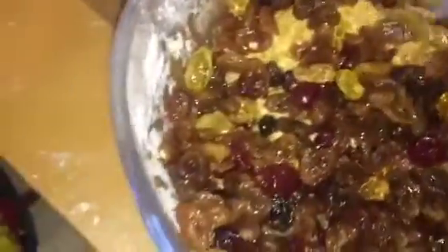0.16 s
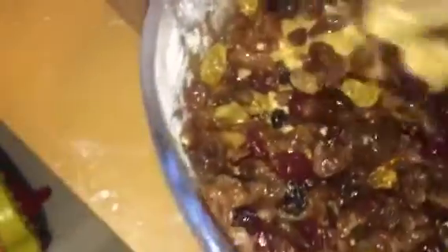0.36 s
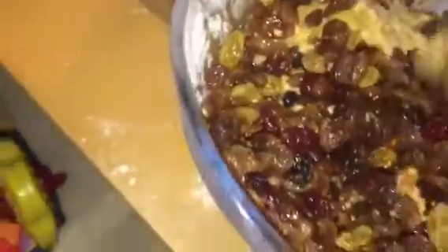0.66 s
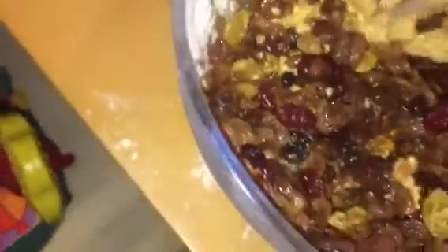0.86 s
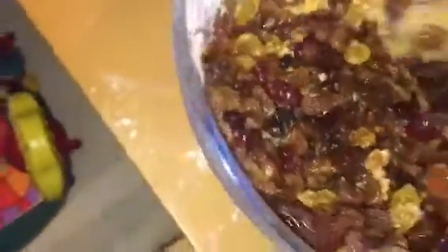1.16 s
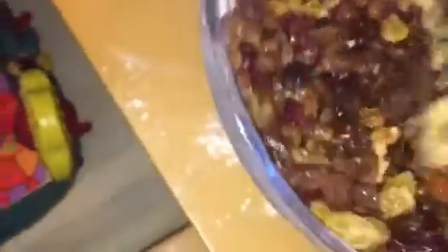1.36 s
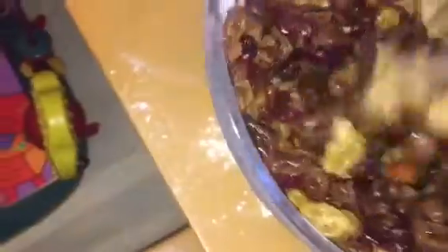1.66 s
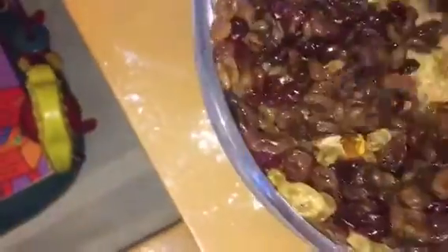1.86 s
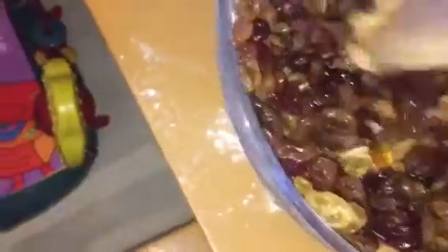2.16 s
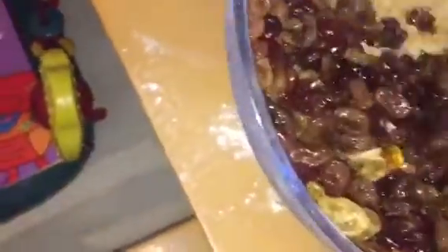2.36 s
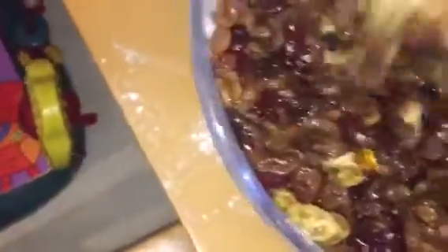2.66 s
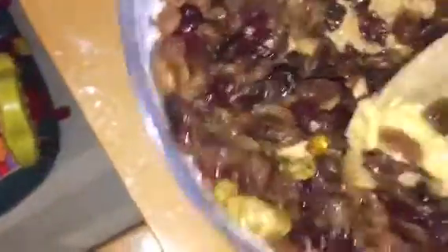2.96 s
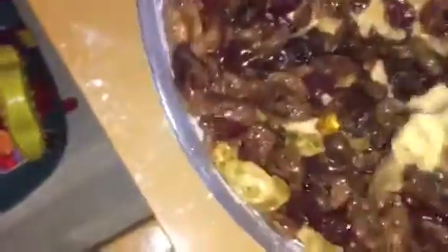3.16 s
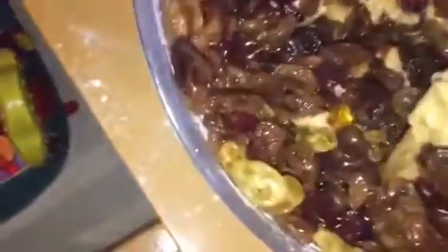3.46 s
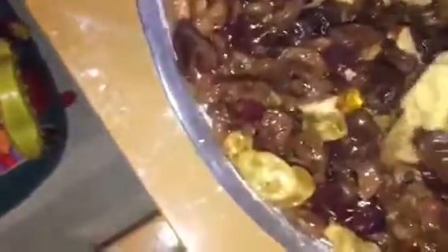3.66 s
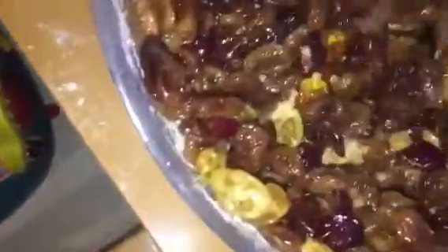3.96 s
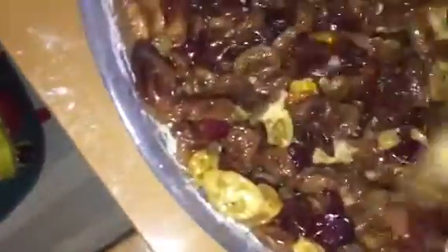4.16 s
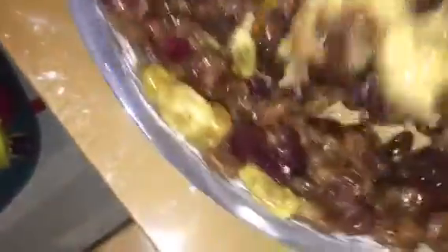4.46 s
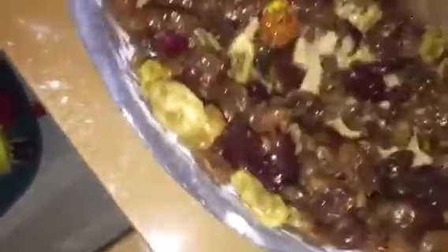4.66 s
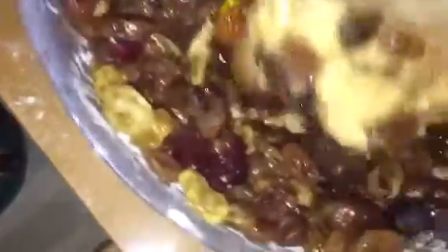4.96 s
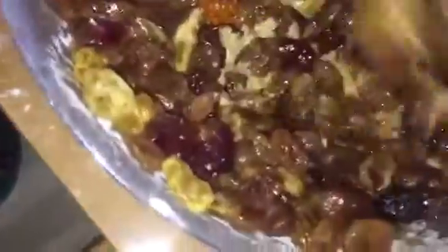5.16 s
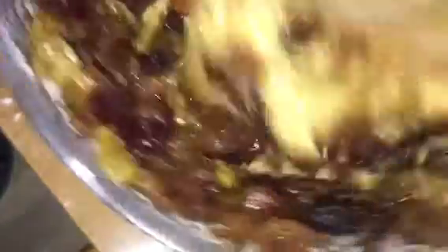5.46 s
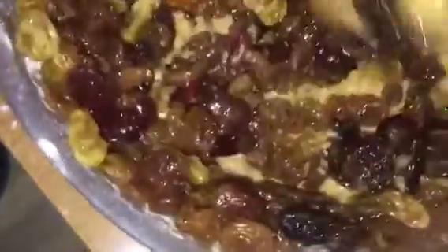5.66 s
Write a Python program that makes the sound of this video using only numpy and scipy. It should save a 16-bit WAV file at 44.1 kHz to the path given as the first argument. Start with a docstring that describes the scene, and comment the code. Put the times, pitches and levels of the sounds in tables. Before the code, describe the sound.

Very close to the microphone, a spoon pushes through heavy, wet fruit dough in short irregular strokes. Each gives a sticky squelch, fine crackle and little popping bubbles. A sharp tap comes early, then bowl thuds on the table around one and three seconds. Near the end the spoon clacks hard against the glass, with more knocks. Small kitchen, short reverberation, faint low hum.

```python
"""Spoon in wet dough

A spoon works heavy, wet fruit dough in a glass bowl on a kitchen table, close to the microphone.
Squelch, crackle and bursting bubbles are sums of tiny decaying sine grains, gated by the strokes.
Bowl knocks and spoon strikes are damped modes plus noise; one sharp tap is a fast falling sweep.
A noise tail gives the small room's answer; filtered noise gives a low hum."""
import sys
import numpy as np
from scipy import signal
from scipy.fft import rfft, irfft, next_fast_len
from scipy.io import wavfile
from scipy.ndimage import uniform_filter1d, map_coordinates

SR = 44100
rng = np.random.default_rng(int(sys.argv[2]) if len(sys.argv) > 2 else 0)


def generate_wav(signal):
    """Clip the signal to [-1, 1] and save it as 16-bit WAV at the path in sys.argv[1]."""
    frames = np.transpose(np.atleast_2d(signal))
    scaled = np.clip(frames, -1, 1) * 32767
    pcm = np.round(scaled).astype(np.int16)
    wavfile.write(sys.argv[1], SR, pcm)


N = 256662  # samples


def amp(db):
    """Decibels to amplitude."""
    return 10 ** (np.asarray(db) / 20)


def unit(x):
    """x scaled to rms 1."""
    return x / np.sqrt(np.mean(x ** 2) + 1e-20)


def crest(x):
    """x scaled to a peak of 1."""
    return x / (np.abs(x).max() + 1e-20)


def along(points, hz):
    """Interpolate (Hz, value) points on a log frequency axis."""
    f, v = np.transpose(points)
    return np.interp(np.log(hz + 1), np.log(f), v)


def fade(t, t60):
    """Decay by 60 dB in t60, in the unit of t."""
    return np.exp(-np.log(1000) * t / t60)


def add(track, s, sound):
    """Mix a sound into the track at s seconds."""
    start = max(round(s * SR), 0)
    track[start:start + len(sound)] += sound[:max(N - start, 0)]


def colour(x, gain):
    """Causal minimum-phase filter with the given gain(Hz), from the folded cepstrum."""
    size = 2 * next_fast_len(len(x) // 2 + 4096)
    log_gain = np.log(np.maximum(gain(np.fft.rfftfreq(size, 1 / SR)), 1e-6))
    cepstrum = irfft(log_gain)
    cepstrum[1:size // 2] *= 2
    cepstrum[size // 2 + 1:] = 0
    response = np.exp(rfft(cepstrum))
    return irfft(rfft(x, size) * response)[:len(x)]


def shaped(x, spectrum):
    """Filter x through a (Hz, dB) spectrum."""
    return colour(x, lambda hz: amp(along(spectrum, hz)))


def wobble(rate):
    """A smooth random curve, rate knots a second."""
    knots = rng.standard_normal(int(N * rate / SR) + 4)
    return map_coordinates(knots, [np.arange(N) * rate / SR])


def patchy(x, depth_db):
    """The colour of x shifts from moment to moment; rms 1."""
    z = signal.stft(x, nperseg=256)[2]
    field = uniform_filter1d(rng.standard_normal(z.shape), size=5, axis=0)
    field = uniform_filter1d(field, size=9, axis=1)
    return unit(signal.istft(z * amp(depth_db * unit(field)), nperseg=256)[1][:N])


def ring(modes, t, detune):
    """Damped modes, with slightly new strengths and pitches for each blow."""
    hz, db, t60 = np.transpose(modes)[:, :, None]
    strength_db, shift = rng.standard_normal((2, len(modes), 1))
    sign = (-1) ** np.arange(len(modes))[:, None]
    tones = np.sin(2 * np.pi * hz * (1 + detune * shift) * t)
    return np.sum(sign * amp(db + strength_db) * fade(t, t60) * tones, axis=0)


def grains(per_s, spread_db, cycles, spectrum):
    """Tiny ruptures of random moment, size and pitch, swelling and dying within a few cycles; rms 1."""
    when, pitch, size, turn = rng.random((int(per_s * N / SR), 4)).T[:, :, None]
    low_hz, high_hz = spectrum[0][0], spectrum[-1][0]
    hz = low_hz + pitch * (high_hz - low_hz)
    k = np.arange(min(int(cycles * SR / low_hz), 300))
    age = hz * k / SR  # in cycles
    gain = amp(along(spectrum, hz) + spread_db * np.minimum(-np.log(1 - size), 3))
    swell = age ** 2 * fade(age, 0.8 * cycles)
    waves = gain * swell * np.sin(2 * np.pi * (age + turn))
    return unit(np.bincount(((when * N).astype(int) + k).ravel(), waves.ravel(), N)[:N])


def hum():
    """Low background of the kitchen: filtered noise, slightly uneven in level and colour."""
    # background spectrum: f/Hz, relative level/dB
    hum_spectrum = [(15, -24), (25, -2.5), (80, -1.5), (212, -3.5), (317, -4.5), (439, -13.5), (591, -15),
                    (659, -17), (936, -17), (2910, -27), (9570, -38), (13200, -41.5), (16000, -35.5)]
    noise = shaped(rng.standard_normal(N), hum_spectrum)
    return amp(-57 + 0.72 * wobble(5)) * patchy(noise, depth_db=2.0)


def kitchen(x):
    """The room's answer: x convolved with a noise tail; each frequency dies at its own speed."""
    # room decay: f/Hz, t60/s
    room_decay = [(70, 0.69), (250, 0.29), (1000, 0.41), (3000, 0.27), (12000, 0.23)]
    onset_s = 0.0017
    hz, t, z = signal.stft(rng.standard_normal(SR), SR, nperseg=256)
    decayed = z * fade(t, along(room_decay, hz)[:, None])
    tail = signal.istft(decayed, SR, nperseg=256)[1]
    tail *= np.clip(np.arange(len(tail)) / SR / onset_s, 0, 1)
    return signal.fftconvolve(x, tail / np.linalg.norm(tail))[:N]


def taps():
    """A brief scuff, then a bending wave that disperses: treble arrives first, so the pitch falls fast."""
    # sharp falling taps: t/s, relative level/dB
    tap_times = [(0.3197, -12)]
    out, t = np.zeros(N), np.arange(SR // 8) / SR
    travel_s, sweep_hz, floor_hz = .0011, 8000, 55
    crest_s, lead_s = .0023, .011  # swell peak after the tap; scuff start before it
    hz = sweep_hz * (travel_s / (t + travel_s)) ** 2 + floor_hz
    phase = 2 * np.pi * np.cumsum(hz) / SR
    swell = (t / crest_s * np.exp(1 - t / crest_s)) ** 2.2
    envelope = swell + amp(-13.5) * fade(t, 0.13)
    for s, db in tap_times:
        snap = amp(-16.5) * rng.standard_normal(len(t)) * fade(t, 0.0098)
        rub_envelope = fade(np.abs(t - lead_s - crest_s), 0.023) + amp(-12) * fade(t, 0.22)
        rub = rng.standard_normal(len(t)) * rub_envelope
        scuff = shaped(rub, [(150, -0.5), (500, 11), (2600, 4.5), (4500, -19)])
        add(out, s - lead_s, amp(db - 13.5) * scuff)
        add(out, s, amp(db) * (np.sin(phase) * envelope + snap))
    return out


def knocks():
    """The rocking bowl thuds and chatters on the table, which booms; a softer contact loses its treble."""
    # bowl on table: t/s, relative level/dB, contact corner f/Hz, relative table boom/dB
    contacts = [(0.6, -52.5, 149, 6.5), (1.123, -39, 1180, -23), (1.302, -15.5, 1035, 0.5),
                (1.383, -32.5, 650, 1), (1.434, -32, 500, 8.5), (1.881, -55, 583, 7),
                (2.877, -37.5, 900, -2), (3.058, -19.5, 580, 4), (3.123, -24.5, 650, -1),
                (4.256, -31.5, 170, 1.5), (4.846, -32.5, 300, 7), (5.2621, -20, 930, 3),
                (5.394, -17.5, 526, -4)]
    # table modes under the bowl: f/Hz, relative level/dB, t60/s before the extra decay
    table_modes = [(64, -11, .7), (79, -5.5, .45), (98, -7, .28), (124, -4, .6), (160, -14, .45),
                   (225, -4, .22), (246, 1, .33), (318, -10, .32), (368, -1, .22), (405, -6, .16)]
    # contact noise spectrum: f/Hz, relative level/dB
    thud_spectrum = [(40, -16), (90, 5.5), (180, 6), (400, 3.5), (560, -0.5), (1200, -1), (2200, 1),
                     (3500, -6.5), (8000, -6.5), (16000, 6)]
    boom_decay_s = 1.9  # t60 of the extra decay of the table boom
    out, t = np.zeros(N), np.arange(SR) / SR
    for s, db, corner_hz, boom_db in contacts:
        soft = lambda hz: 1 / np.sqrt(1 + (hz / corner_hz) ** 4.28)
        chatter = rng.standard_normal(len(t)) * (fade(t, 0.079) + amp(-13.5) * fade(t, 0.31))
        thud = unit(colour(chatter, lambda hz: soft(hz) * amp(along(thud_spectrum, hz))))
        table = ring(table_modes, t, detune=0.0054) * fade(t, boom_decay_s)
        boom = colour(table, soft)
        add(out, s, amp(db) * (amp(-20) * thud + amp(boom_db - 4.5) * boom))
    return out


def strikes():
    """The spoon gives a short clack and a crack; the bowl's glass wall rings on until the dough damps it."""
    # spoon on bowl: t/s, relative clack/dB, relative glass ring/dB, ring corner f/Hz,
    # dough damping t60/s, echo/dB re clack
    hits = [(0.576, -45, -51.5, 4800, 0.16, -9), (1.7768, -37, -62, 3000, .1, -27),
            (3.57, -37.5, -72, 3000, .1, -15), (3.991, -46, -34.5, 4950, 8.6, -1),
            (4.131, -23, -66, 3000, .1, -3.5), (5.2628, -5.5, -17, 7400, 0.087, -16.5)]
    # spoon against the dough-damped bowl: f/Hz, relative level/dB, t60/s
    spoon_modes = [(465, -0.5, 0.026), (610, -6, 0.059), (707, 2, 0.013), (868, -9, 0.045),
                   (1008, -4, 0.031), (1141, -8, 0.037), (1303, -3.5, 0.014), (1690, -14, 0.019),
                   (2068, -22, 0.1), (2520, -13.5, 0.023)]
    # glass wall: f/Hz, relative level/dB, t60/s before the dough's damping
    glass_modes = [(1109, -17, .11), (1995, 0, .24), (3010, -11, .21), (4180, -8, .15), (5510, -16, .19),
                   (6960, -18, .08), (8577, -19, .09)]
    out, echo, t = np.zeros(N), np.zeros(N), np.arange(SR // 2) / SR
    for s, clack_db, glass_db, corner_hz, damping_s, echo_db in hits:
        noise = rng.standard_normal(len(t)) * fade(t, 0.034)
        crack = amp(-15.0) * shaped(noise, [(2500, 16.0), (4000, -0.5), (16000, -12)])
        body = ring(spoon_modes, t, detune=.015)
        clack = amp(clack_db) * (body + crack) * (1 - fade(t, 0.0039))
        wall = ring(glass_modes, t, detune=0.00091) * fade(t, damping_s)
        glass = amp(glass_db) * colour(wall, lambda hz: 1 / np.hypot(1, (hz / corner_hz) ** 4))
        add(out, s, clack + glass)
        add(echo, s, amp(echo_db) * clack)
    return out + kitchen(echo)


def burst(pitch_hz, life_s):
    """A cavity that rings briefly and rises in pitch as it opens, with band-passed noise; peak 1."""
    t = np.arange(SR // 25) / SR
    shape = fade(t, life_s) * (1 - np.exp(-t / .0006))
    tone = crest(np.sin(2 * np.pi * pitch_hz * t * (1 + 6 * t)) * shape)
    band = lambda hz: 1 / (1 + (hz / pitch_hz - pitch_hz / (hz + 1)) ** 2)
    tear = colour(rng.standard_normal(len(t)) * shape, band)
    return crest(.5 * tone + crest(tear))


def pops():
    """Large air pockets burst as the dough opens: a noise snap and a short ring."""
    # air pockets: t/s, relative peak/dB, starting pitch f/Hz, relative snap/dB
    pockets = [(0.05, -33, 5900, 15), (0.266, -39, 1190, 2), (0.818, -32, 4230, 11),
               (0.862, -28, 1740, -21), (0.885, -28, 1290, -18), (0.968, -35.5, 1140, 7.5),
               (1.162, -23, 2130, 5), (1.167, -19.5, 1740, -24), (1.17, -24.5, 2100, -8),
               (1.198, -22, 1190, 10.5), (1.663, -26, 2280, -28), (1.702, -28.5, 2510, -26),
               (2.082, -36.5, 2690, -14), (2.196, -37, 2320, -12), (2.481, -25, 1660, 2),
               (2.491, -22.5, 1900, -1), (2.653, -30.5, 2410, -12), (2.67, -26.5, 1640, -11),
               (2.881, -19.5, 2155, -9), (3.808, -33, 2080, -17), (4.419, -40.5, 6100, -22),
               (4.499, -33.5, 1670, 2), (4.529, -35, 1690, 6), (4.804, -25, 770, -11),
               (5.042, -32.5, 2670, 9), (5.534, -33, 4030, -8)]
    # snap spectrum: f/Hz, relative level/dB
    snap_spectrum = [(1500, -39), (4000, 19.5), (7000, 22.5), (14000, 22.5), (16500, -16)]
    out, t = np.zeros(N), np.arange(SR // 25) / SR
    for s, db, pitch_hz, snap_db in pockets:
        snap = shaped(rng.standard_normal(len(t)) * np.sqrt(t) * fade(t, 0.011), snap_spectrum)
        pop = burst(pitch_hz, life_s=0.014) + amp(snap_db - 2.5) * crest(snap)
        add(out, s - .001, amp(db - 2.0) * crest(pop))
    return out


def cracks():
    """Short, sharp bursts without the snap: fruit cracking under the spoon, and an air pocket that bursts
    quickly."""
    # cracks and quick pops: t/s, relative peak/dB, starting pitch f/Hz
    short_bursts = [(3.0649, -28.5, 3070), (3.5701, -37, 2150), (4.7712, -27.5, 1080), (4.7793, -20, 2440),
                    (4.7824, -17.5, 2420), (5.3147, -33, 2610)]
    out = np.zeros(N)
    for s, db, pitch_hz in short_bursts:
        add(out, s, amp(db + 2) * burst(pitch_hz, life_s=0.0075))
    return out


def push(t, s, length_s, swell_db):
    """One stroke: the spoon takes hold, presses harder or eases off, and lets go."""
    grip_s, release_t60_s = 0.019, 0.044
    grip = np.clip((t - s) / grip_s + 1, 0, 1) ** 2  # complete at s
    press = amp(swell_db * (np.clip((t - s) / length_s, 0, 1) - .5))
    return grip * press * fade(np.maximum(t - s - length_s, 0), release_t60_s)


def dough():
    """Sticky dough tears in clumps: squelch, crackle, small bubbles, snapping threads and a low drag."""
    # spoon strokes: t/s, length/s, relative squelch/dB, relative crackle/dB, start-to-end swell/dB
    strokes = [(0.0, 0.082, -62, -52, -2), (0.088, 0.055, -56.5, -69, 1), (0.266, 0.04, -55, -57.5, -12),
               (0.362, 0.16, -57, -49.5, -9), (0.553, 0.015, -58.5, -51.5, 9),
               (.82, 0.073, -48.5, -48.5, 6), (0.927, 0.083, -60.5, -58, -5.5),
               (1.054, 0.062, -55.5, -62.5, 2), (1.144, 0.15, -50.5, -45.5, -7.5),
               (1.344, 0.071, -45.5, -55, 11), (1.434, 0.064, -52.5, -66, -6),
               (1.49, 0.086, -49.5, -59.5, -5), (1.644, 0.13, -46, -51.5, 5.5),
               (2.044, 0.06, -55, -51.5, 3), (2.162, 0.14, -58.5, -53, 9.5),
               (2.482, 0.035, -42.5, -48, -6.5), (2.649, 0.024, -46.5, -49.5, 7),
               (2.853, .02, -43, -50, 7.5), (2.882, .04, -47.5, -52, -11), (2.966, 0.056, -52.5, -52, 4.5),
               (3.124, 0.11, -56.5, -60.5, -6), (3.309, 0.016, -76, -60.5, 3),
               (3.573, 0.0013, -47, -43, -17.5), (3.668, 0.11, -63, -60.5, 4),
               (3.809, 0.079, -58.5, -53, -2.5), (3.919, 0.06, -55, -53.5, -1),
               (4.21, 0.18, -48.5, -55.5, -2.5), (4.406, .18, -62, -58.5, 17),
               (4.778, 0.086, -47, -50.5, -8.5), (4.883, 0.07, -43.5, -51.5, -1.5),
               (4.962, 0.12, -59, -61.5, -8.5), (5.241, .002, -56, -49.5, 1.5),
               (5.296, 0.15, -44, -51.5, -5), (5.473, 0.065, -45.5, -51, 4.5),
               (5.725, 0.038, -51, -56, 3.5)]
    # wet grains: f/Hz, relative grain level/dB
    squelch_spectrum = [(700, -6), (1300, -2.5), (2000, 3.5), (3000, -3), (4500, -9)]
    # fine grains: f/Hz, relative grain level/dB
    crackle_spectrum = [(3500, -3), (6500, 6), (9500, 6.5), (11000, 3), (14000, 9.5), (16000, -22.5)]
    # drag on the bowl: f/Hz, relative level/dB
    drag_spectrum = [(30, -21), (70, -3.5), (170, 4.5), (350, -13.5), (900, -38.5), (3000, -22)]
    t, wet, fine = np.arange(N) / SR, np.zeros(N), np.zeros(N)
    uneven = amp(1.47 * wobble(66))  # lumps of fruit make the push uneven
    for s, length_s, squelch_db, crackle_db, swell_db in strokes:
        effort = uneven * push(t, s, length_s, swell_db)
        wet += effort * amp(squelch_db)
        fine += effort * amp(crackle_db)

    clumps = amp(1.0 * wobble(110))
    wet_grains = grains(per_s=2800, spread_db=3.5, cycles=13, spectrum=squelch_spectrum)
    fine_grains = grains(per_s=5300, spread_db=4.5, cycles=8.1, spectrum=crackle_spectrum)
    squelch = wet * amp(-4.0) * unit(clumps * wet_grains)
    crackle = fine * amp(-4.0) * unit(clumps * fine_grains)
    tearing = squelch + crackle
    # folds open and close, so the colour keeps changing
    tearing = np.std(tearing) * patchy(tearing, depth_db=3.2)

    drag = wet * amp(-8.5) * unit(shaped(rng.standard_normal(N), drag_spectrum))
    # tiny bubbles keep bursting, between strokes too
    settling = amp(-77) * grains(per_s=270, spread_db=8, cycles=8, spectrum=crackle_spectrum)
    # small air pockets burst during strokes
    bubbles = grains(per_s=70, spread_db=5.5, cycles=16, spectrum=squelch_spectrum)
    bursting = wet * amp(-11) * bubbles
    # sticky threads snap with a click
    clicks = grains(per_s=130, spread_db=3, cycles=2.5, spectrum=crackle_spectrum)
    threads = fine * amp(-8) * clicks
    return tearing + drag + settling + bursting + threads


def scene():
    """Mix the direct sources, their room answer and the hum."""
    thuds, tap = knocks(), taps()
    wet = dough() + pops() + cracks()
    room = kitchen(amp(-8.0) * thuds + amp(-12) * wet + amp(-35) * tap)
    return (hum() + room + tap + thuds + strikes() + wet)[None]


def record(dry):
    """Shed deep bass, round off the highest peaks and keep nothing above the band limit."""
    bass_cut_hz, peak_limit, top_hz = 48, .9, 16000
    x = signal.sosfilt(signal.butter(3, bass_cut_hz, "high", fs=SR, output="sos"), dry)
    x = x / (1 + (x / peak_limit) ** 8) ** (1 / 8)
    size = next_fast_len(N + SR // 2)
    passband = np.fft.rfftfreq(size, 1 / SR) < top_hz
    return irfft(rfft(x, size) * passband, size)[:, :N]


dry = scene()
out = record(dry)
generate_wav(out)
```